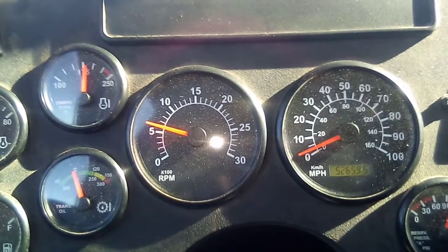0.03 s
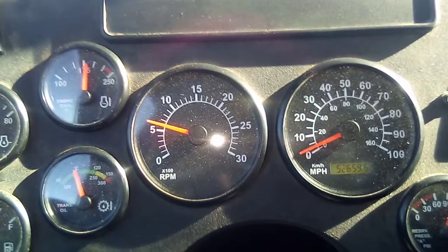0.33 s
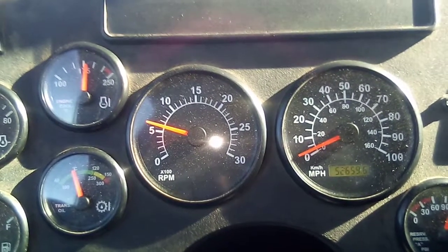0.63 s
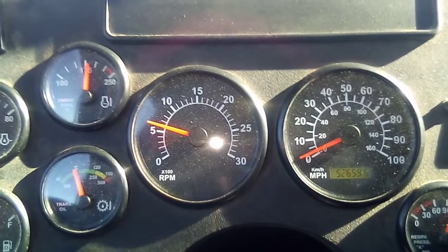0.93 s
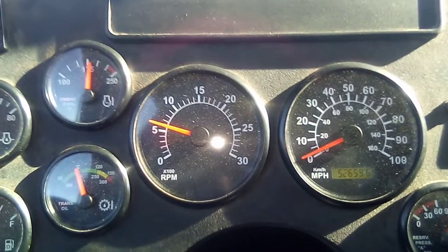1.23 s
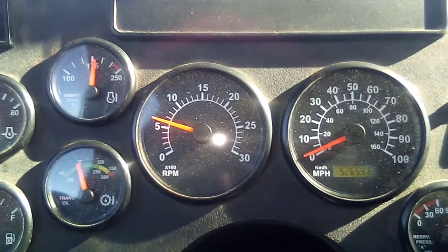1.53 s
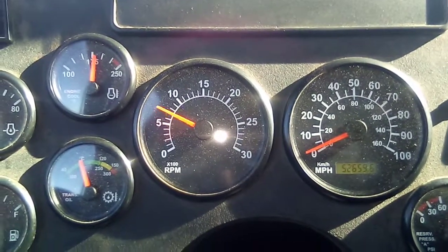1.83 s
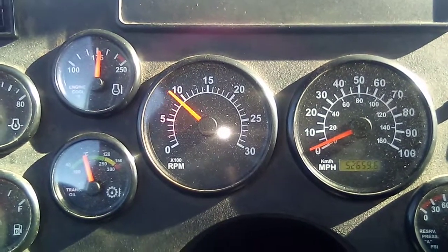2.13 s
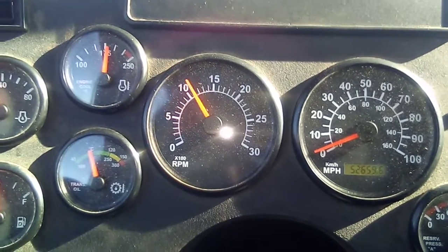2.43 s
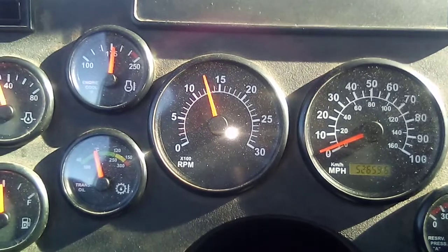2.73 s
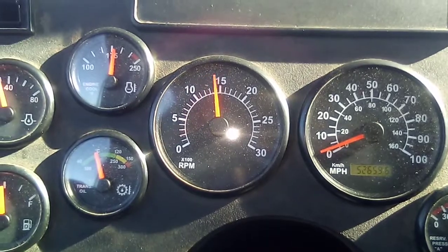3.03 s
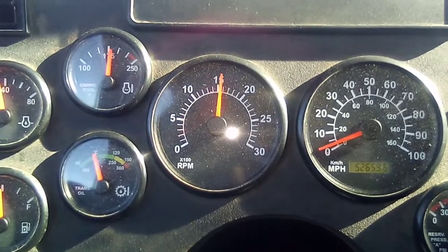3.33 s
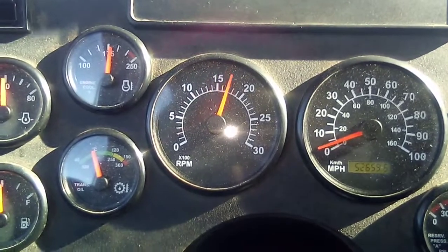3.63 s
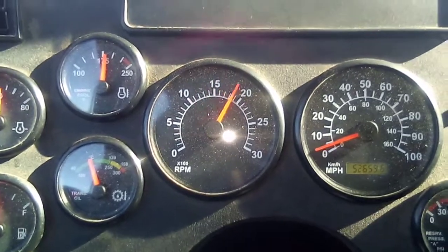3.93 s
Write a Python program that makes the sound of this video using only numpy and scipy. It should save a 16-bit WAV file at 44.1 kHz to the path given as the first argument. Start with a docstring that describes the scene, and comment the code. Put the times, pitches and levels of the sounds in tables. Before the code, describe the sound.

A heavy diesel engine, heard on a hand-held microphone in the truck cab, rumbles at idle and then climbs smoothly in speed. Its drone swells over a humming fan, lightly ringing panels and a faint rising turbo whine.

```python
"""Diesel revving, inside the cab

From a hand-held microphone in a truck cab: a six-cylinder diesel idles, then revs steadily up.
The firing note booms in the cab over combustion clatter and injector ticks. A fan gathers speed,
and the turbo spools from a breathy whistle to a thin high whine over the hiss of the intake.
Around the microphone, ducts and panels ring and the trim bumps softly."""
import sys
import numpy as np
from scipy import signal
from scipy.fft import rfft, irfft
from scipy.io import wavfile

SR = 44100
rng = np.random.default_rng(int(sys.argv[2]) if len(sys.argv) > 2 else 0)


def file_out(sig):
    """Save sig as 16-bit WAV at sys.argv[1]."""
    # one column per channel
    cols = np.atleast_2d(sig).T
    # limit, then scale
    lim = np.clip(cols, -1, 1)
    pcm = np.round(lim * 32767).astype(np.int16)
    wavfile.write(sys.argv[1], SR, pcm)


N = 176400
T = np.arange(N) / SR


def exhaust(firings):
    """The firing note booms in the cab, with its octave and the rougher orders of unequal cylinders."""
    # firing note, its octave and the order midway between them (time [s], level [dB])
    boom = [(0, -50.5), (1.15, -81), (1.55, -50), (1.86, -32.5), (2.05, -22), (2.25, -16), (3.15, -16.5),
            (3.38, -15), (3.6, -17.5), (3.76, -20.5), (4, -20)]
    octave = [(0, -35), (1.12, -36), (1.27, -24.5), (1.4, -31), (1.55, -26), (1.75, -28), (2.02, -24),
              (2.35, -52), (2.7, -35.5), (2.95, -34), (3.25, -52), (3.5, -42), (3.76, -33), (4, -35.5)]
    midway = [(0, -64), (1.2, -49), (1.8, -32), (2.15, -37), (2.6, -44.5), (2.9, -34.5), (3.45, -54),
              (3.6, -28.5), (3.76, -31), (4, -27.5)]
    # the other engine orders (multiple of the firing rate, relative level [dB])
    rough_orders = [(.5, -15), (.833, -11), (1.167, -6), (1.333, -10), (2.5, -23), (3, -14), (3.5, -22),
                    (4, -21), (4.5, -21), (5, -15), (6, -22.5), (8, -25), (9, -22.5), (10, -22.5),
                    (12, -26.5)]
    # their common gain (time [s], gain [dB])
    rough_gain = [(0, -50.5), (1.2, -39), (2, -38), (2.5, -42.5), (3.48, -42), (3.62, -35), (4, -24)]
    uneven_firings = firings + .025 * drift(hz=70)
    rough = orders(uneven_firings, rough_orders)
    return (amp(curve(boom)) * tone(firings)
            + amp(curve(octave)) * tone(2 * firings)
            + amp(curve(midway)) * tone(1.5 * firings)
            + amp(curve(rough_gain)) * rough)


def combustion(firings):
    """Each firing throws a burst of growl, clatter, knock, hiss and rumble, and a sharp injector tick."""
    # the six cylinders in firing order (strength [dB])
    cylinders = [-1.9, 1.2, -1.3, 1.5, -0.38, 0.84]
    # engine noise at the seat (time [s], growl [dB], clatter [dB], knock [dB], intake hiss [dB])
    levels = [(0, -44.5, -45, -49, -51.5), (.35, -44.5, -44, -49.5, -50), (.92, -46, -44.5, -49.5, -48),
              (1.27, -43.5, -42.5, -51.5, -53), (1.65, -43.5, -43.5, -51, -54),
              (2.08, -41.5, -43.5, -51.5, -55.5), (2.2, -43.5, -45.5, -55.5, -60),
              (2.4, -43.5, -46, -57.5, -62), (2.8, -44, -47.5, -56, -61.5), (3.1, -42, -44.5, -55, -61),
              (3.48, -43.5, -46, -55, -57.5), (3.62, -40, -42, -52.5, -57), (4, -42.5, -43, -49, -55)]
    # injector ticks and cab rumble (time [s], level [dB])
    tick_level = [(0, -74.5), (.4, -72.5), (1.36, -76), (1.5, -87), (2.3, -93.5), (3.1, -83.5),
                  (3.7, -76.5), (4, -66)]
    rumble_level = [(0, -32.5), (1, -36.5), (1.9, -31.5), (2.6, -35.5), (3.4, -34), (4, -41.5)]
    # colour of each noise (frequency [Hz], relative density [dB])
    growl = [(120, -27), (200, 3), (300, -2), (350, 1.5), (390, -0.5), (440, -2.5), (500, 1.5), (570, -2),
             (650, -1.5), (850, -30), (2000, -58), (8000, -100)]
    clatter = [(450, -32), (620, -4.5), (760, -2), (830, 1.5), (890, -0.5), (980, -0.5), (1050, -4.5),
               (1130, -9), (1210, -9.5), (1330, -11.5), (1600, -18), (3000, -57), (8000, -97)]
    knock = [(700, -28), (1300, -1), (1600, -1), (2000, 2.5), (2300, -1), (2600, 2), (3000, -13),
             (3600, -11), (6000, -39.5), (10000, -59)]
    hiss = [(1500, -21), (3000, 0.5), (3350, 1), (3550, -2), (3750, -0.5), (4150, -0.5), (4600, -1),
            (5500, -1.5), (6300, -5), (7150, -12), (7800, -21), (8400, -27.5), (10000, -43.5), (13000, -45),
            (16000, -43.5)]
    tick = [(4000, -2.5), (7500, -2), (8600, 5), (9100, 3), (9800, 3.5), (11000, 0.5), (12000, -7.5),
            (13400, -5.5), (15000, -4), (16000, -10)]
    rumble = [(10, -16), (22, -27.5), (36, -12.5), (48, -19.5), (62, -3.5), (90, 4), (125, -4.5),
              (160, -0.5), (190, -12), (260, -19), (500, -75), (6000, -105)]
    # reflections off dash and glass (delay [s])
    reflections = [.0025, .0041, .0067]
    stroke = firings.astype(int)
    scatter_db = rng.standard_normal(1000)
    strength = amp(np.array(cylinders)[stroke % len(cylinders)] - scatter_db[stroke])
    delays = [delay + .00015 * drift(hz=.8) for delay in reflections]  # the microphone sways in the hand

    def pulsed(spectrum, share, fade_cycles=.42):
        """Fluttering noise of rms 1, a share of it gated by the firings."""
        burst = unit(np.exp(-(firings % 1) / fade_cycles) * strength)
        flutter = amp(1.02 * drift(hz=26.4))
        noise = rng.standard_normal(N) * (1 - share + share * burst) * flutter
        return unit(colour(ringing(noise, delays), spectrum))

    return (amp(curve(levels, column=1)) * pulsed(growl, share=.13)
            + amp(curve(levels, column=2)) * pulsed(clatter, share=.13)
            + amp(curve(levels, column=3)) * pulsed(knock, share=.22)
            + amp(curve(levels, column=4)) * pulsed(hiss, share=.29)
            + amp(curve(tick_level)) * pulsed(tick, share=.58, fade_cycles=.17)
            + amp(curve(rumble_level)) * pulsed(rumble, share=.39))


def fan():
    """A four-bladed fan hums as it gathers speed."""
    # the fan's run (time [s], shaft speed [turns/s], blade note [dB], its octave [dB])
    run = [(0, 21.2, -28, -46), (.28, 25.2, -31, -60), (.42, 25.4, -26, -47), (.75, 25.6, -25, -49.5),
           (1, 26.9, -28, -50.5), (1.3, 28.8, -32.5, -47.5), (1.7, 26.8, -32, -53),
           (2.02, 28.9, -42.5, -40.5), (2.3, 27, -38, -59), (2.85, 28.2, -39, -48), (3.3, 27, -37.5, -45.5),
           (4, 29.5, -49, -48)]
    # weaker fan tones (multiple of the shaft speed, level against the blade note [dB])
    shaft_orders = [(3, -15), (5, -10.5), (6, -23.5), (7, -21), (11, -23.5)]
    shaft = turns(curve(run))
    blades = 4 * shaft
    hum = amp(curve(run, column=2)) * (tone(blades) + orders(shaft, shaft_orders))
    return hum + amp(curve(run, column=3)) * tone(2 * blades)


def turbo():
    """Two fluttering blade tones climb with the shaft: a thin whine and a breathy whistle above it."""
    # spool-up (time [s], whine pitch [Hz], whine [dB], breathy whistle [dB])
    spool = [(0, 2600, -77, -53), (.22, 2842, -76, -51), (.52, 3198, -73, -48), (.75, 3440, -78.5, -55),
             (1, 3680, -83, -59), (1.25, 3961, -75, -66), (1.6, 4120, -69.5, -70), (2.3, 4500, -76, -83.5),
             (2.65, 5050, -82, -86.5), (2.87, 5740, -74, -89), (3.15, 6670, -72, -88),
             (3.5, 8250, -73, -90), (3.72, 9320, -69, -73.5), (3.85, 9850, -74, -72), (4, 10020, -72, -83)]
    # intake duct resonances, in which the whistle flares (frequency [Hz], gain [dB])
    duct = [(4300, -3.5), (4850, 1.5), (5080, -2.5), (5300, -3), (5750, 0), (6050, 3), (6300, 5), (7000, 2)]
    hz = curve(spool) * (1 + .005 * drift(hz=20))
    whine = amp(curve(spool, column=2)) * whistle(hz, width_hz=150)
    breathy = amp(curve(spool, column=3)) * colour(whistle(hz * 1.667, width_hz=580), duct)
    flutter = amp(2 * drift(hz=24))
    return (whine + breathy) * flutter


def panels():
    """Ducts and panels around the microphone sing for a while, wavering, as the engine excites them."""
    # resonances (pitch [Hz], width [Hz], held from [s], held to [s], fade either side [s], level [dB])
    rings = [(750, 30, .19, .56, .12, -40.5), (735, 50, 0, .2, .1, -45.5), (645, 50, 0, .8, .13, -48),
             (820, 50, .72, 2.2, .12, -53), (745, 40, 1.3, 2.1, .12, -52), (1218, 40, .45, 1.25, .15, -55),
             (468, 110, 1.85, 2.06, .12, -47), (232, 25, 1.95, 2.06, .08, -40),
             (1200, 50, 3.05, 3.55, .15, -56), (1205, 75, 3.58, 4, .06, -47.5),
             (485, 110, 3.55, 4, .1, -52), (2620, 200, 3.3, 4, .3, -63), (5630, 950, 3.74, 4, .26, -55),
             (15096, 800, 3.62, 4, .15, -77)]
    out = np.zeros(N)
    waver = 1 + .007 * drift(hz=6)
    for hz, width, start, end, fade, db in rings:
        swell = np.clip(1 + np.minimum(T - start, end - T) / fade, 0, 1)
        out += amp(db) * swell * whistle(hz * waver, width)
    return out


def trim_bumps():
    """Soft bumps in the cab set the trim's modes ringing briefly."""
    # bumps (time [s], pitch [Hz], rise [s], time to fall 60 dB [s], level [dB])
    bumps = [(.072, 265, .008, .08, -27.5), (2.68, 360, .03, .17, -31), (2.974, 522, .001, .04, -32)]
    # trim modes (multiple of the bump's pitch, relative level [dB])
    trim_modes = [(.6, -4), (.82, -5), (1, 0), (1.3, -8), (1.65, -9)]
    out = np.zeros(N)
    for start, hz, rise, t60, db in bumps:
        age = np.maximum(T - start, 0)
        modes = sum(amp(mode_db) * tone(ratio * hz * age) for ratio, mode_db in trim_modes)
        out += amp(db) * np.minimum(age / rise, 1) * decay(age, t60) * modes
    return out


def faint_clicks():
    """Tiny high clicks, each only a few cycles long."""
    # clicks (time [s], level [dB])
    clicks = [(2.012, -57), (2.112, -55), (2.752, -56), (3.112, -50), (3.272, -51), (3.671, -49)]
    hz, half_width_s = 12000, .00013
    out = np.zeros(N)
    for at, db in clicks:
        envelope = np.exp(-((T - at) / half_width_s) ** 2)
        out += amp(db) * envelope * np.sin(2 * np.pi * hz * (T - at))
    return out


def orders(cycles, table):
    """Multiples of a rotation, rounded to sixths, each swaying in strength and coloured by the cab."""
    # response of the cab's air (frequency [Hz], gain [dB])
    cab_air = [(30, -7.5), (50, -2), (80, 4.5), (115, 0.5), (135, -5.5), (160, 7), (185, -8.5), (220, 6.5),
               (260, -12.5), (300, -2.5), (350, 2.5), (480, -0.5), (1200, -5.5)]
    sway_db = 4
    lines = sum(amp(db + sway_db * drift(hz=5)) * tone(np.round(multiple * 6) / 6 * cycles)
                for multiple, db in table)
    return colour(lines, cab_air)


def ringing(x, delays):
    """Shifting cab reflections and block modes that come and go give noise a metallic grain."""
    # modes of the engine block and cab trim (frequency [Hz], lift [dB])
    block = [(960, 1), (1335, 3), (1645, 3), (1898, 2.5), (2035, 3.5), (2115, 2), (2592, 2), (3100, 4),
             (3400, 3), (3790, 3), (4110, 3), (5080, 2), (5595, 2), (5945, 1.5), (8550, 4), (9600, 3),
             (10250, 3), (11000, 4)]
    reflection_share, echo_share, mode_width_hz = .22, .25, 45
    hz = np.fft.rfftfreq(N, 1 / SR)
    reflected = sum(np.interp(T - delay, T, x) for delay in delays)
    echoes = rng.standard_normal(N) * decay(T, t60=.07)
    echo_response = np.clip(hz / 1000, 0, 1) * rfft(echoes / np.linalg.norm(echoes))  # thin in the bass
    spectrum = rfft(x + reflection_share * reflected) * (1 + echo_share * echo_response)
    out = irfft(spectrum, N)
    for modes in (block[::2], block[1::2]):  # two sets that sway independently
        lift = sum((amp(db) - 1) / (1 + (2 * (hz - mode) / mode_width_hz) ** 2) for mode, db in modes)
        out += irfft(spectrum * lift, N) * (1 + .6 * drift(hz=3))
    return out


def amp(db):
    """Decibels to gain."""
    return 10 ** (np.asarray(db) / 20)


def unit(x):
    """Scales to rms 1."""
    return x / np.sqrt(np.mean(x ** 2) + 1e-20)


def decay(age, t60):
    """A fall of 60 dB every t60 seconds."""
    return np.exp(-np.log(1000) * age / t60)


def curve(table, column=1):
    """One column of a time table, at every sample."""
    rows = np.array(table, float)
    return np.interp(T, rows[:, 0], rows[:, column])


def colour(x, spectrum):
    """Filters by a table of (frequency [Hz], gain [dB])."""
    hz, db = np.transpose(spectrum)
    gain_db = np.interp(np.log(np.fft.rfftfreq(N, 1 / SR) + 1), np.log(hz), db)
    return irfft(rfft(x) * amp(gain_db), N)


def drift(hz):
    """Random motion of rms 1, up to about the given rate."""
    f = np.fft.rfftfreq(N, 1 / SR)
    return unit(irfft(rfft(rng.standard_normal(N)) / (1 + (f / hz) ** 2) ** 2, N))


def turns(hz):
    """Cycles completed at a changing rate."""
    return np.cumsum(hz * np.ones(N)) / SR


def whistle(hz, width_hz):
    """Noise in a resonance that can move."""
    angle = 2 * np.pi * turns(hz)
    return unit(drift(width_hz) * np.cos(angle) + drift(width_hz) * np.sin(angle))


def tone(cycles):
    """A sine of rms 1 with a random starting phase."""
    return np.sqrt(2) * np.sin(2 * np.pi * (cycles + rng.random()))


def scene():
    """Engine, fan, turbo and cab at one microphone."""
    # engine speed, from idle upward (time [s], firing rate [Hz])
    speed = [(0, 29.94), (1.17, 29.94), (1.27, 33.3), (1.5, 41.6), (1.75, 48.6), (1.87, 55), (2.02, 58.6),
             (2.25, 63), (2.5, 70.2), (3, 81.6), (3.45, 94.8), (3.62, 95.5), (3.76, 99), (4, 100.6)]
    wobble = 1 + .0052 * drift(hz=14)
    firings = .58 + turns(curve(speed) * wobble)  # starts partway through a firing cycle
    engine = exhaust(firings) + combustion(firings)
    return (engine + fan() + turbo() + panels() + trim_bumps() + faint_clicks())[None]


def record(dry):
    """The microphone's faint hiss, then the recorder's band limit."""
    noisy = dry + amp(-83) * rng.standard_normal(N)
    lowpass = signal.firwin(511, cutoff=15750, window=("kaiser", 9), fs=SR)
    return signal.oaconvolve(noisy, lowpass[None], "same")


dry = scene()
out = record(dry)
file_out(out)
```